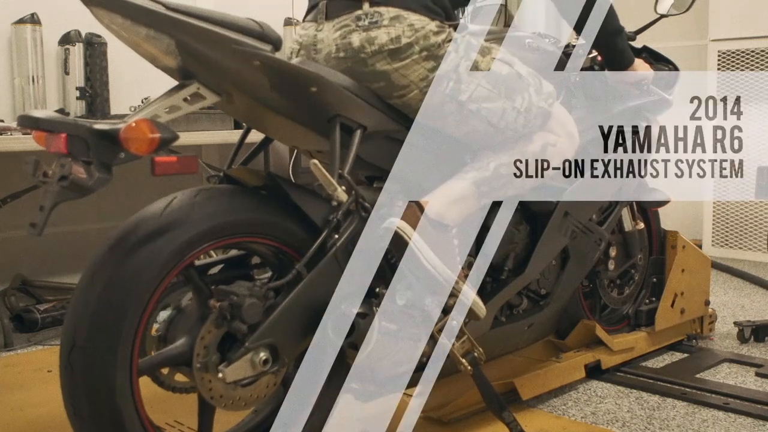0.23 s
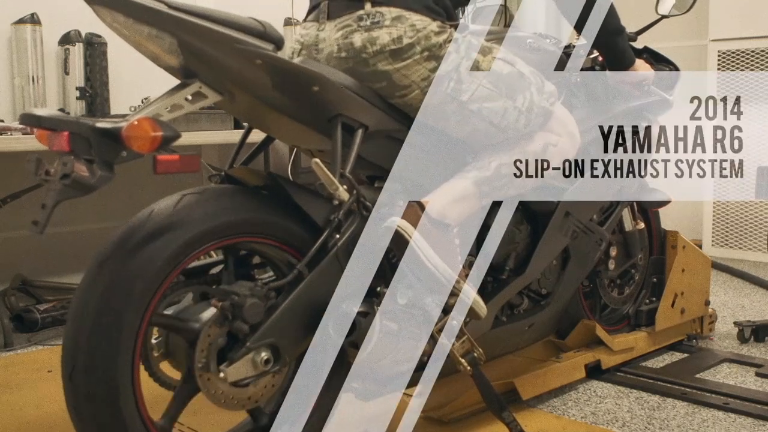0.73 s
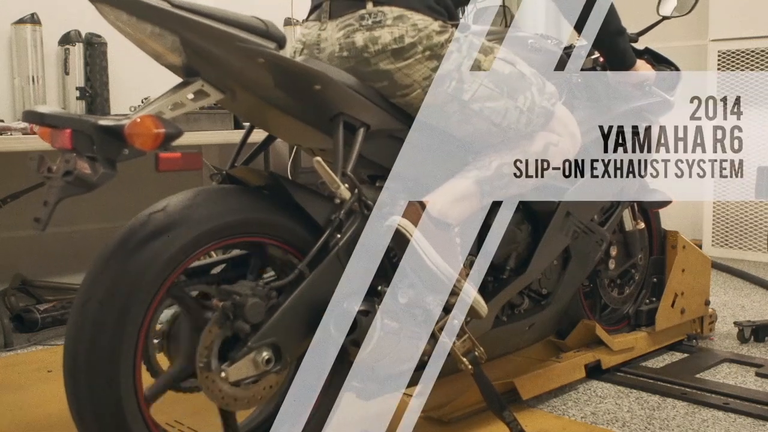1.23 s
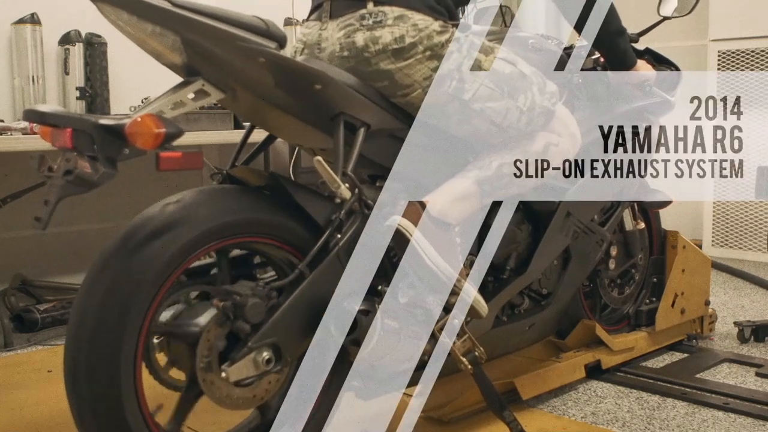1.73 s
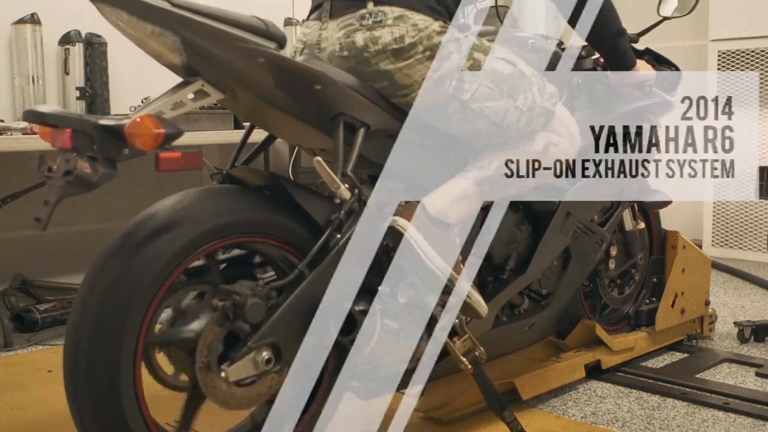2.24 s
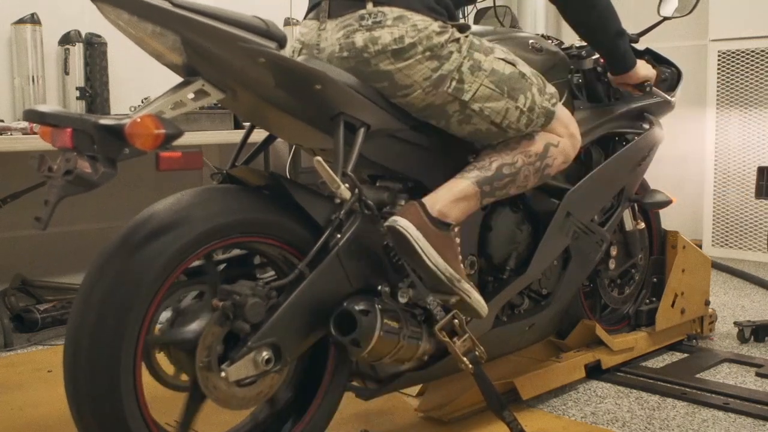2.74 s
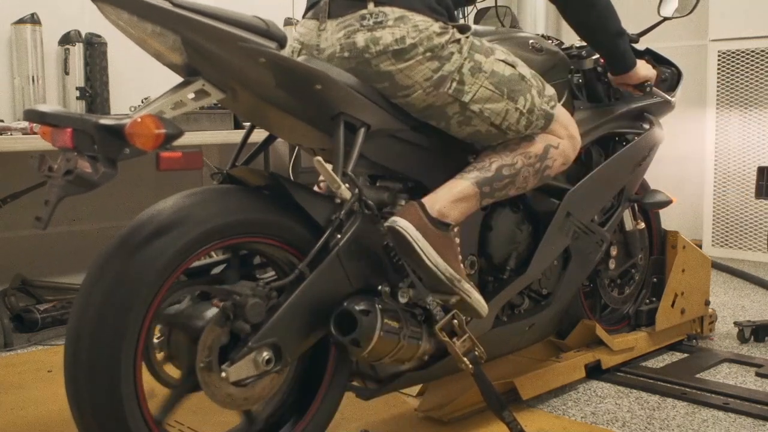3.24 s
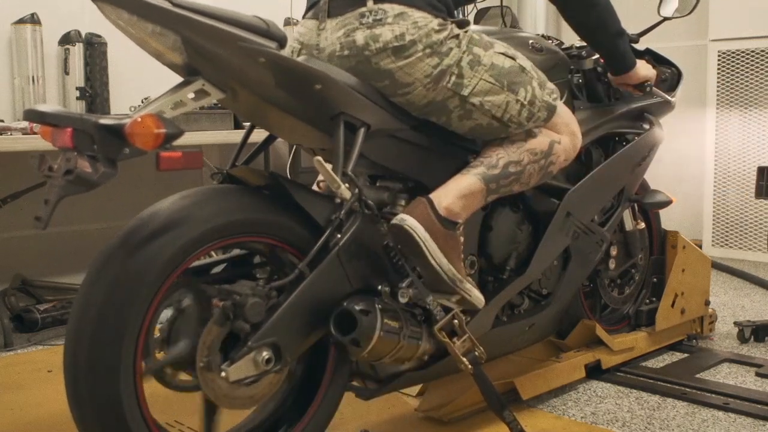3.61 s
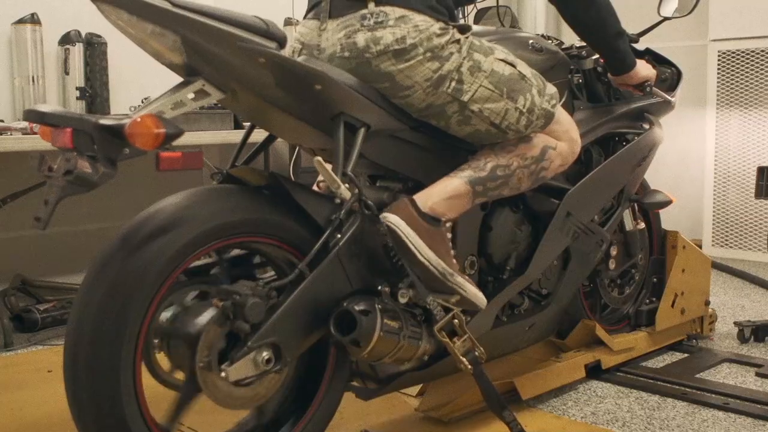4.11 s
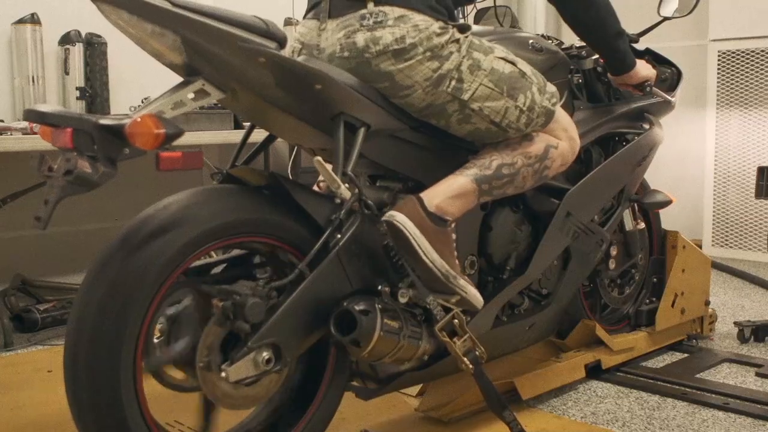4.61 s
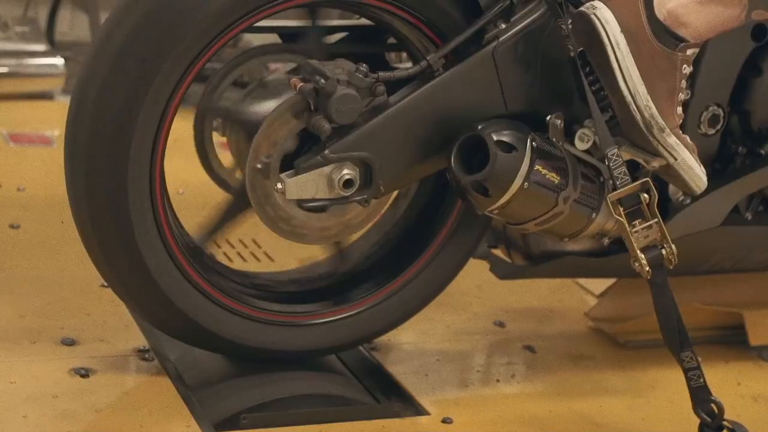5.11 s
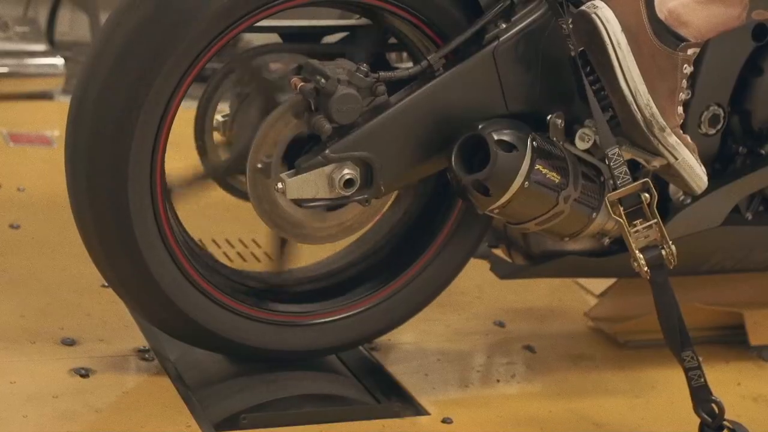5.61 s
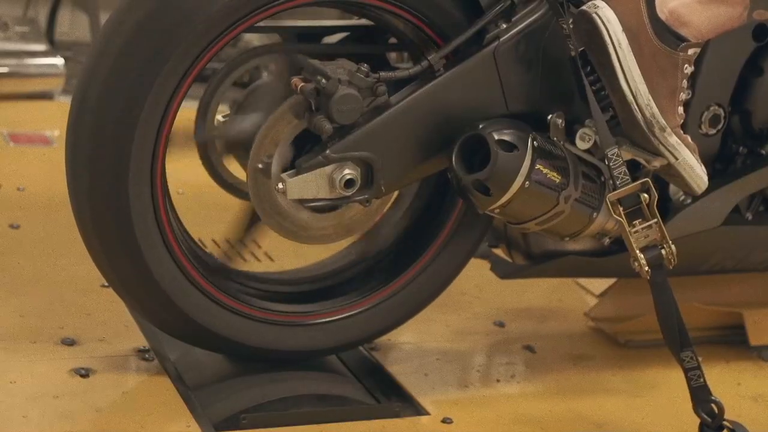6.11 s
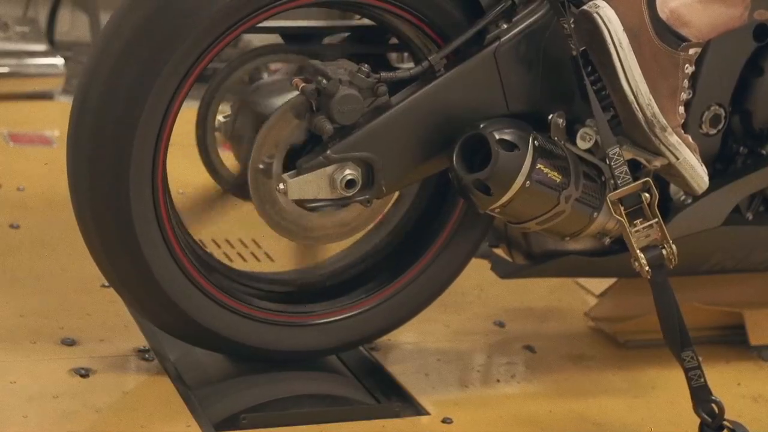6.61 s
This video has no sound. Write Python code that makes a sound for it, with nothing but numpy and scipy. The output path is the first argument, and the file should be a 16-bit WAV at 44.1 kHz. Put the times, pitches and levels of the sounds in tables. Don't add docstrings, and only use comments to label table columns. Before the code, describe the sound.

The sound swells in on a rough, low motorcycle exhaust with brief cuts, surrounded by fan air and duct hum. Revs jump, ease down and dip with a sharp stutter. Then one unbroken acceleration climbs to the end, its tone colored by pipe and room resonances, with intake roar, ticking slack chain, ringing metal and rising gear whine. Essentially mono, with the right side louder.

```python
import sys
import numpy as np
from scipy import signal
from scipy.io import wavfile
from scipy.ndimage import uniform_filter1d

SR = 44100
rng = np.random.default_rng(int(sys.argv[2]) if len(sys.argv) > 2 else 0)


def voltage_ratio(level):
    return 10 ** (np.asarray(level, float) / 20)


def materialize(psi):
    bounded = np.clip(np.atleast_2d(psi).T, -1, 1)
    quanta = np.round(bounded * 32767).astype(np.int16)
    wavfile.write(sys.argv[1], SR, quanta)


N = 302526
TIME = np.arange(N) / SR


def evened(x):
    return x / np.sqrt(np.mean(x ** 2) + 1e-20)


def read(points, hz):
    f, value = np.transpose(points)
    return np.interp(np.log(hz + 1), np.log(f + 1), value)


def bump(x, centre, width):
    return np.exp(-0.5 * ((x - centre) / width) ** 2)


def control(index, t=TIME):
    # time in seconds, engine cycles in Hz (half the crank speed), load in dB.
    engine = [(0.0, 22.8, -2), (0.27, 23.7, -0.1), (0.72, 23.55, -0.8), (0.86, 25.42, -2),
              (1.16, 37.63, -0.5), (1.26, 40.3, -0.5), (1.41, 42.57, -0.5), (1.91, 35.15, -0.5),
              (2.29, 30.7, -4), (2.6, 24.89, -1.5), (2.75, 20.1, -0.5), (2.92, 23.6, 0), (3.53, 35.03, -.4),
              (3.8, 40.09, -0.5), (4.13, 45.9, 2), (4.97, 60.12, -1), (5.69, 73.7, -0.2), (6.86, 94.5, 1)]
    return np.interp(t, *np.transpose(engine)[[0, index]])


def speed(t=TIME):
    return np.clip((control(1, t) - 25) / 55, 0, 1.3)


def shop_db(hz):
    # frequency in Hz, width in Hz, level in dB.
    shop = [(90, 3, -5), (131.3, 3.5, -4.5), (229, 7.53, -5), (267.6, 10.7, -8.5), (320.5, 5.9, -11),
            (384, 19, -1.5), (439, 18.4, -6.5), (485, 26, 7), (513, 11, -1.5), (600, 11.88, 0),
            (670.4, 10, 6.5), (710, 15, 0.5), (727, 19, -4), (1037, 49, 8.5), (1316, 66, 6)]
    return sum(db * bump(hz, f, width) for f, width, db in shop)


def fuzzy(hz, width, start=0, end=TIME[-1]):
    on = (TIME >= start) & (TIME <= end)
    settle = SR // 2
    r = np.exp(-np.pi * width / SR)
    a, b = rng.standard_normal((2, on.sum() + settle), dtype=np.float32)
    slow = signal.lfilter([1], np.convolve([1, -r], [1, -r]), a + 1j * b)[settle:]
    turns = np.cumsum((hz * np.ones(N))[on]) / SR
    out = np.zeros(N)
    out[on] = evened((slow * np.exp(2j * np.pi * turns)).real)
    return out


def span(start, end):
    place = np.clip((TIME - start) / (end - start), 0, 1)
    return np.abs(np.sin(np.pi * place)) ** 0.5


def coloured(x, gain_db):
    hz = np.abs(np.fft.fftfreq(2 ** 16, 1 / SR))
    log_gain = np.log(voltage_ratio(gain_db(hz)))
    spectrum = np.exp(np.conj(signal.hilbert(log_gain)))
    taps = np.fft.ifft(spectrum).real[:2 ** 14]
    return signal.fftconvolve(x, taps)[:N]


def exhaust():
    # time in seconds, depth in dB, length in seconds of a throttle stumble.
    stumbles = [
        (.05, -4, .02),
        (.13, -10, .035),
        (.3, -10, .03),
        (.57, -3, .03),
        (2.708, -10, .011),
        (2.75, -3, .03),
        (2.83, -4, .02),
        (2.88, -3, .015),
    ]
    # multiple of the engine cycle, level in dB.
    whole = [(2, 2), (4, -4), (6, -7.5), (8, -12), (10, -16), (12, -22), (14, -42)]
    # multiple of the engine cycle, level in dB.
    half = [(1, 8), (3, 3), (5, -4.5), (7, -11.5), (9, -14), (11, -15.5), (13, -30), (15, -13.5)]
    # frequency in Hz, gain in dB.
    pipe_whole = [(20, -82), (45, -51.5), (60, -50.5), (78, -37.5), (100, -37.5), (120, -23.5), (150, -18),
                  (195, -21), (250, -26.5), (345, -25), (410, -30.5), (470, -42), (700, -37), (1400, -43.5)]
    # frequency in Hz, gain in dB.
    pipe_half = [(20, -105), (50, -75), (85, -55.5), (130, -68), (150, -42.5), (190, -34), (250, -37),
                 (350, -31), (410, -42.5), (470, -46.5), (700, -48.5), (1400, -49)]
    misfire_slow, misfire_fast = 0.061, 0.035

    turns = np.cumsum(control(1)) / SR
    strength = rng.standard_normal(2000)
    misfire = misfire_slow + (misfire_fast - misfire_slow) * speed()
    uneven = 1 + 0.5 * misfire * np.interp(4 * turns, np.arange(2000), strength)
    load_db = control(2) + sum(db * bump(TIME, s, length) for s, db, length in stumbles)
    sharp_db = 0.16 * np.log2(control(1) / 50)
    out = np.zeros(N)
    for orders, pipe in ((whole, pipe_whole), (half, pipe_half)):
        pulses = np.zeros(N)
        for k, db in orders:
            pulses += voltage_ratio(db + k * sharp_db) * np.sqrt(2) * np.cos(2 * np.pi * k * turns)
        out += coloured(pulses * uneven * voltage_ratio(load_db), lambda hz: read(pipe, hz) + shop_db(hz))
    return out


def rush_db(t, hz):
    idle_db, rise_db = -41, 2.5
    roar_s, roar_length_s, roar_db = 3.587, 0.31, 2.5
    middle = read([(300, 0.6), (2000, 0.9), (9000, 0.38)], hz)
    return idle_db + rise_db * speed(t) ** 2 + roar_db * bump(t, roar_s, roar_length_s) * middle


def rush():
    # frequency in Hz, density in dB per Hz.
    rush_slow = [(25, -21), (50, 5), (100, 14.5), (180, 19), (350, 16.5), (430, 5.5), (550, 8.5),
                 (1000, 1.5), (2000, -3), (4000, -10), (8000, -13), (12000, -18.5), (15500, -21.5)]
    # frequency in Hz, density in dB per Hz.
    rush_fast = [(25, -26), (50, -7), (100, 13.5), (180, 16), (350, 9), (430, 7.5), (550, 8), (1000, 1.5),
                 (2000, -1), (4000, -7), (8000, -14.5), (12000, -19.5), (15500, -20.5)]
    blades_hz = 81.85
    bright_db, bright_rise_db = -2.5, 4.5
    size, hop = 2048, 512

    frames = N // hop + 5
    hz = np.fft.rfftfreq(size, 1 / SR)[:, None]
    t = np.arange(frames) * hop / SR
    a, b, patches = rng.standard_normal((frames, len(hz), 3), dtype=np.float32).T
    patches = uniform_filter1d(patches, size=20, axis=0)
    patches = evened(uniform_filter1d(patches, size=8, axis=1))
    fast = np.minimum(speed(t), 1)
    colour_db = (1 - fast) * read(rush_slow, hz) + fast * read(rush_fast, hz) + 0.24 * shop_db(hz)
    treble_db = read([(3000, 0), (9000, 1)], hz) * (bright_db + bright_rise_db * speed(t))
    z = (a + 1j * b) * voltage_ratio(colour_db + treble_db + rush_db(t, hz) + 0.73 * patches)
    air = signal.istft(z, nperseg=size, noverlap=size - hop)[1][:N]

    blades = sum(np.cos(2 * np.pi * k * blades_hz * TIME) for k in range(1, 5))
    crank_beat = np.cos(4 * np.pi * np.cumsum(control(1)) / SR)
    low = signal.lfilter(*signal.butter(2, 2500, fs=SR), air)
    return voltage_ratio(-23) * (air * (1 + 0.047 * crank_beat) + 0.045 * blades * low)


def blower():
    # frequency in Hz, level in dB, width in Hz.
    tones = [
        (330, -49, 5),
        (350, -41.5, 11),
        (495, -55, 5),
        (577.5, -54, 2),
        (660, -64, 3),
        (742.5, -58, 2),
        (825, -59, 1),
        (1072, -60, 5),
    ]
    return voltage_ratio(0.4) * sum(voltage_ratio(db) * fuzzy(hz, width) for hz, db, width in tones)


def ringing_metal():
    # start in seconds, end in seconds, frequency in Hz, width in Hz, level in dB.
    rings = [
        (3.45, 3.9, 4500, 300, -57),
        (.6, 1.15, 4500, 200, -65),
        (2.3, 2.7, 4450, 200, -64),
        (2.95, 3.35, 4500, 200, -65),
        (3.95, 4.3, 4500, 200, -66),
        (3.45, 3.6, 5700, 150, -64),
        (0, 4.3, 6500, 160, -69),
        (.8, 4.2, 11400, 200, -76),
        (6.2, 7.4, 4800, 2500, -53),
    ]
    return sum(voltage_ratio(db) * span(a, b) * fuzzy(hz, width, a, b) for a, b, hz, width, db in rings)


def chain():
    # time in seconds, length in seconds, frequency in Hz, rms level in dB.
    rattles = [(.53, .06, 10500, -62), (1.06, .08, 8500, -61), (1.69, .04, 10300, -56),
               (2.19, .1, 10400, -56.5), (2.71, .03, 10800, -60), (2.85, .1, 10500, -62),
               (3.23, .04, 10500, -65), (3.52, .03, 10500, -63), (3.92, .08, 10700, -60),
               (4.33, .08, 10000, -59), (5.4, .06, 12000, -64)]
    ticks_per_s, decay_s = 6000, 0.0008
    t = np.arange(200) / SR
    heights = voltage_ratio(2 * rng.exponential(1, N))
    struck = rng.random(N) < ticks_per_s / SR
    ticks = evened(heights * struck * rng.choice([-1, 1], N))
    out = np.zeros(N)
    for s, length, hz, db in rattles:
        tick = np.sin(2 * np.pi * hz * t) * voltage_ratio(-60 * t / decay_s)
        clump = voltage_ratio(db) * np.exp(-4 * ((TIME - s) / length) ** 2)
        out += signal.oaconvolve(ticks * clump, tick / np.linalg.norm(tick))[:N]
    return out


def gears():
    # start in seconds, end in seconds, multiple of the engine cycle, level in dB.
    whines = [(4.3, 6.8, 11.5, -59), (3.3, 6.86, 17.25, -59), (4.4, 5.4, 17.25, -55), (4.3, 4.9, 23, -57),
              (5.5, 6.8, 23, -63), (4.6, 6.0, 34.5, -62), (4.7, 5.5, 41, -64), (5.3, 6.0, 46, -64),
              (4.8, 6.86, 51.75, -65), (4.55, 5.55, 82, -60.5), (4.85, 5.3, 164, -67)]
    out = np.zeros(N)
    for a, b, k, db in whines:
        out += voltage_ratio(db) * span(a, b) * fuzzy(k * control(1), k * k / 70, a, b)
    return out


def scene():
    mono = exhaust() + rush() + blower() + ringing_metal() + chain() + gears()
    return np.array([mono, mono])


def roll_off(x):
    return signal.sosfilt(signal.butter(12, 15670, fs=SR, output="sos"), x)


def record(dry):
    fade_db, fade_s = -6.5, 2.08
    left_db, right_db = -3, 5
    knee_db, squeeze, sense_s, recover_db_per_s = -30, 0.4, 0.15, 9

    x = dry * voltage_ratio(fade_db * np.maximum(1 - TIME / fade_s, 0))
    r = np.exp(-1 / (sense_s * SR))
    power_db = 10 * np.log10(signal.lfilter([1 - r], [1, -r], x[1] ** 2) + 1e-12)
    fall = recover_db_per_s * TIME
    held_db = np.maximum.accumulate(power_db + fall) - fall
    over_db = np.maximum(held_db - knee_db, 0)
    gains = voltage_ratio(np.array([left_db + 0 * TIME, right_db - squeeze * over_db]))
    hiss = voltage_ratio(-95) * rng.standard_normal((2, N))
    return roll_off(x * gains + hiss)


dry = scene()
out = record(dry)
materialize(out)
```